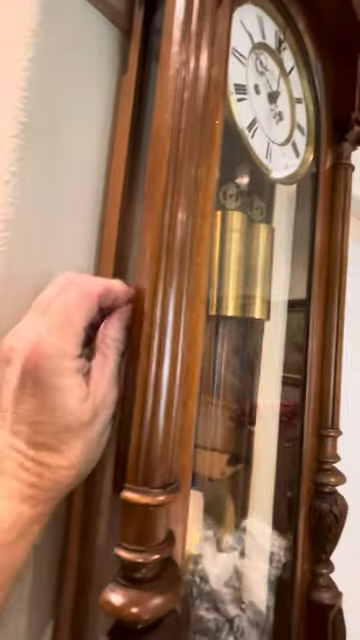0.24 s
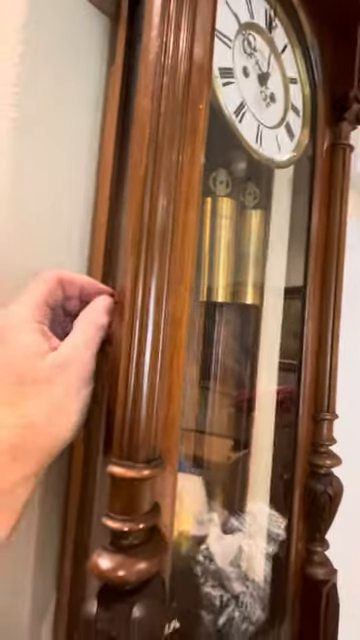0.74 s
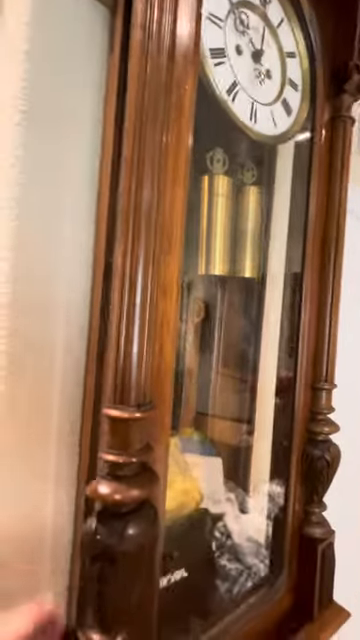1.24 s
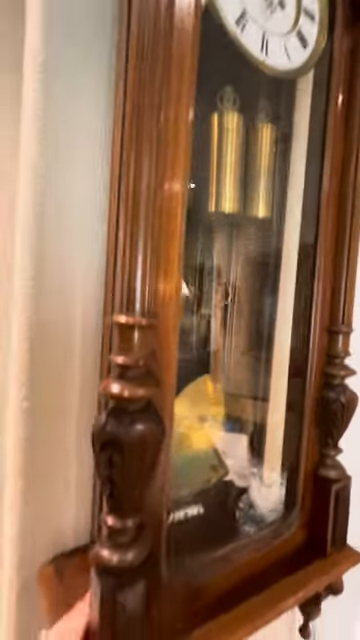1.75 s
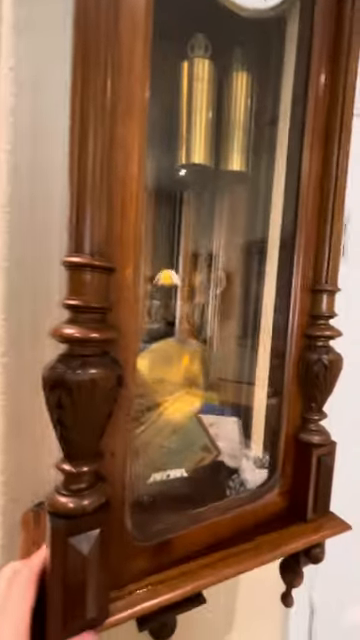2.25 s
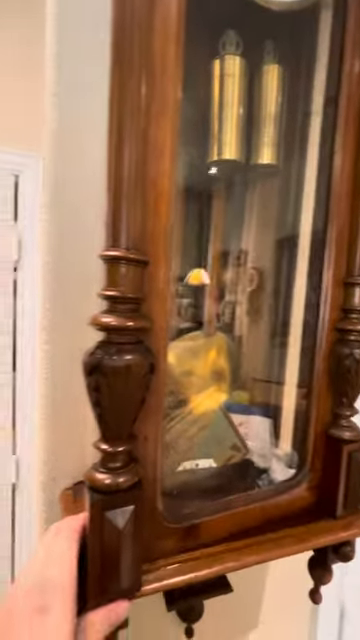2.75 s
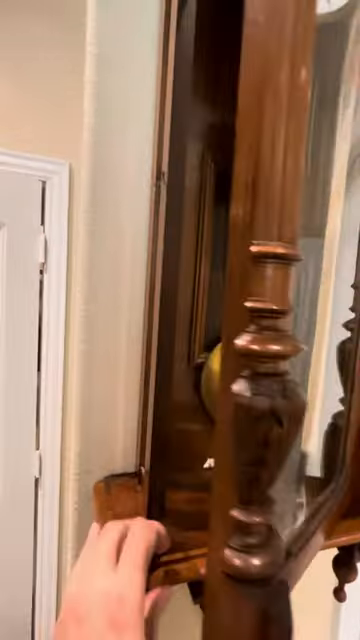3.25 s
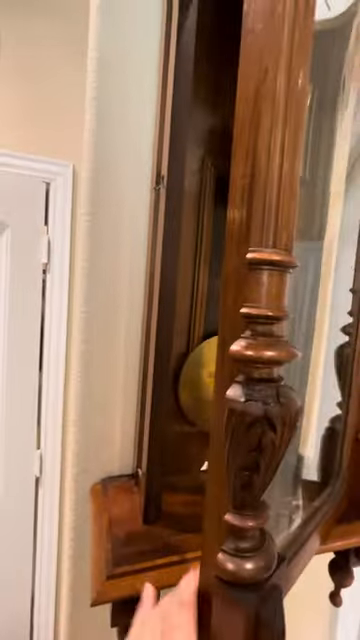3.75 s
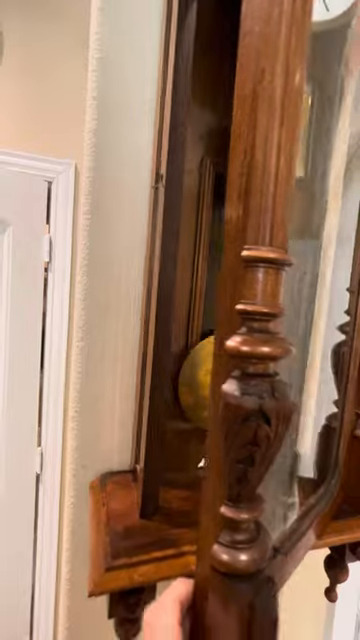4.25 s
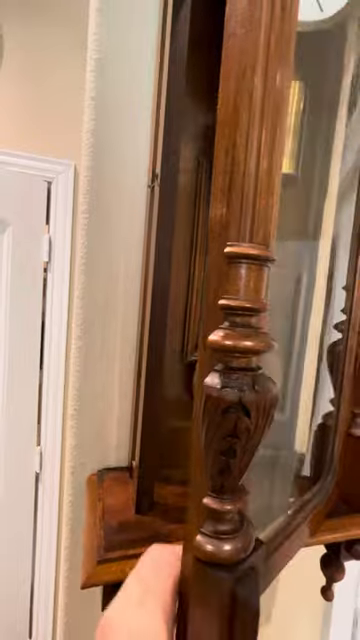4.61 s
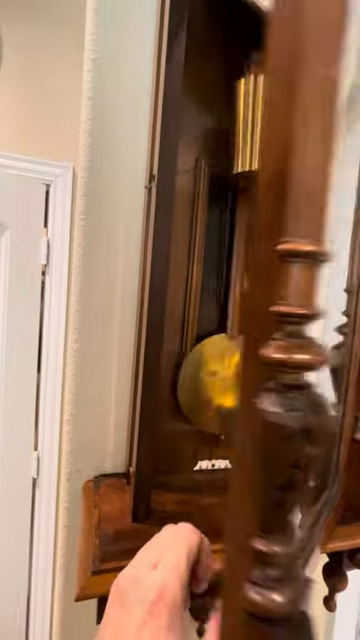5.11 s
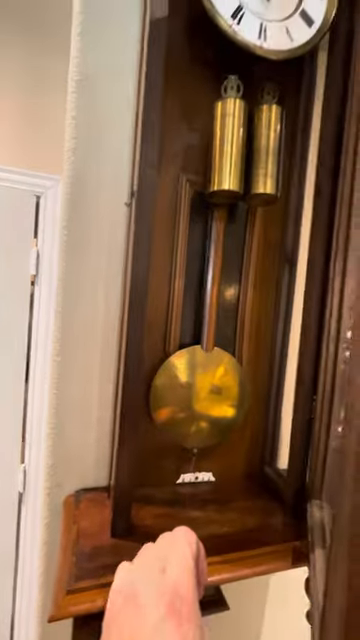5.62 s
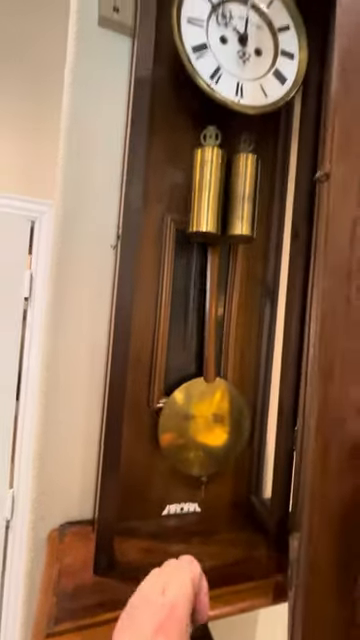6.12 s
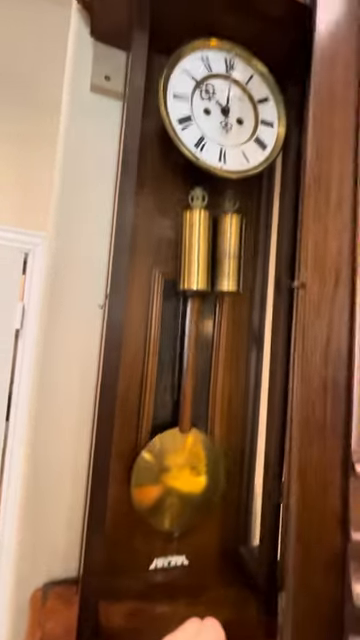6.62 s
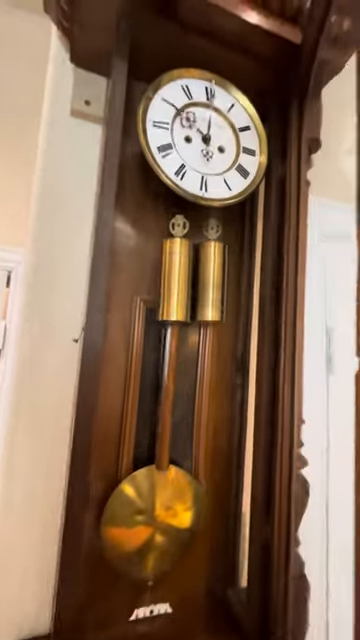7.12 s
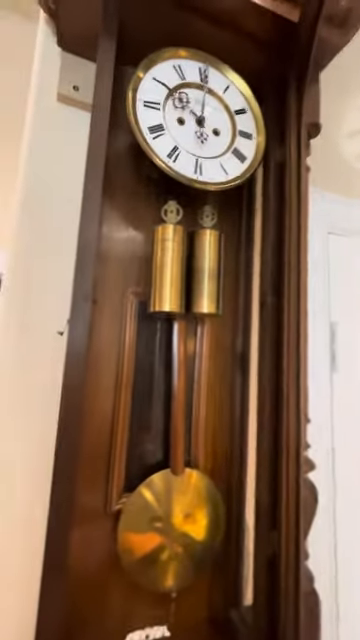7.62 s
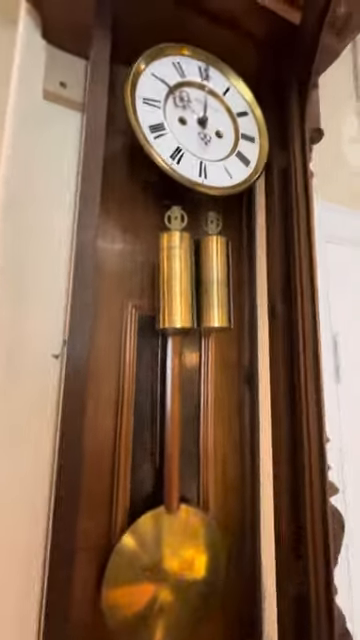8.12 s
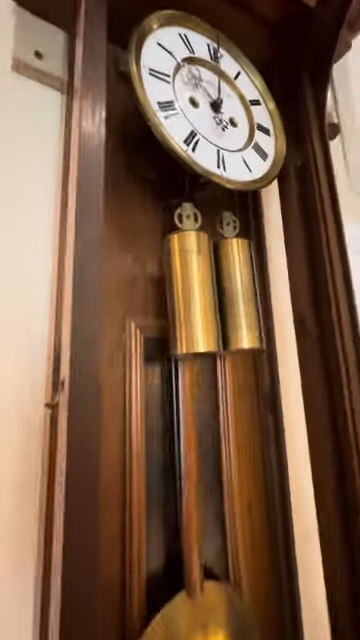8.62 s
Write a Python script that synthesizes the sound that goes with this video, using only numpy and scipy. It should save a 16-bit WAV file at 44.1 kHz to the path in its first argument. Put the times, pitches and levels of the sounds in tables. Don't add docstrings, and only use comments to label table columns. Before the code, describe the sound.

A hand unlatches and opens the glazed door of a wooden wall clock, with sharp snaps, woody knocks, rubbing and faint ticks.

```python
import sys
import numpy as np
from scipy import signal
from scipy.fft import rfft, irfft, next_fast_len
from scipy.io import wavfile
from scipy.ndimage import uniform_filter1d

SR = 44100
rng = np.random.default_rng(int(sys.argv[2]) if len(sys.argv) > 2 else 0)


def volts_from_decibels(level):
    exponent = np.asarray(level, float) / 20
    return 10 ** exponent


def transcribe(u):
    v = np.clip(np.atleast_2d(u).T, -1, 1)
    q = np.round(v * 32767).astype(np.int16)
    wavfile.write(sys.argv[1], SR, q)


N = 390726
HZ = np.maximum(np.fft.rfftfreq(next_fast_len(N + SR), 1 / SR), 1)

# start in seconds, strength in dB, sharpness in dB,
# weight on the panels in dB, contact length in seconds.
SNAPS = [
    (0.191, -37, -5, 4, 0.02),
    (1.8483, -49, 3, 5.5, 0.026),
    (2.0771, -30, 5.5, -10, 0.024),
    (2.6262, -28.5, 7.5, -17, 0.0088),
    (2.8063, -22, 11, -5.5, 0.017),
    (3.5285, -33.5, 2.5, -12.5, 0.018),
    (3.7895, -28, 7, -6, 0.0337),
    (4.9251, -29, 15, -10, 0.013),
    (4.9304, -24.5, 5, -10.5, 0.024),
    (5.4283, -37.5, -8, -8, 0.03),
]
TOUCHES = [(7.871, -41.5, -9.5, -0.5, 0.13), (3.515, -43, -14, -30, 0.0056), (.001, -60, -33, -18, 0.13),
           (.538, -60, 6, -2, 0.016), (.5482, -56.5, -7, -0.5, 0.064), (.816, -66.5, 16, 15.5, 0.023),
           (.8724, -64, -16, -2, 0.039), (1.175, -69.5, 0, -4.5, 0.013), (4.347, -40, -2, -22, 0.02),
           (2.269, -60.5, -31, -7, 0.11), (3.1874, -47, -3, -1.5, 0.035), (3.225, -48, -4, -1, 0.0126),
           (3.401, -74, 16, 8.5, 0.053), (3.7363, -56, -13.5, -6, 0.12), (3.9964, -62.5, 9.5, -8, 0.05),
           (4.2384, -64, 0, -3, 0.088), (5.2143, -54, 3, -16, 0.028), (5.512, -49.5, -10, 6.5, 0.089),
           (5.7777, -55.5, 2.5, -11, 0.054), (8.163, -64, 7, 5.5, 0.11), (8.183, -50, -0.5, -10, 0.096),
           (8.2462, -51.5, -8.5, 0.5, 0.12)]
# start in seconds, strength in dB, brightness in dB,
# sharpness in dB, contact length in seconds.
KNOCKS = [(0.195, -32.5, -3, 2, 0.047), (0.84, -47.5, -2, 0, 0.0071), (1.974, -40.5, -12.5, -18, 0.02),
          (2.78, -42.5, -5.5, 4, 0.0092), (3.036, -45, -4.5, 0, 0.046), (3.491, -40.5, -18.5, -26, 0.014),
          (4.06, -56.5, -12.5, 14.5, 0.013), (4.2999, -26.5, -30, 0.5, 0.01),
          (4.3085, -32, -8.5, -2.5, 0.04), (4.327, -34.5, -4, -8, 0.058), (4.567, -43.5, -17, -12, 0.019),
          (4.642, -50, -3.5, 4, 0.028), (5.348, -49.5, -5, -2, 0.052), (5.582, -44.5, -10, -27, 0.025),
          (7.402, -59, 2.5, -11.5, 0.095), (7.534, -53.5, -19.5, 2, 0.043), (7.678, -53.5, -18, -16, 0.053),
          (7.736, -55.5, -18, -16, 0.036)]
# start in seconds, strength in dB, sharpness in dB.
HINGE_SLIPS = [(6.5518, -56.5, -22), (6.5605, -55.5, -9), (6.6008, -48.5, -9), (6.6385, -54.5, -2),
               (6.6549, -52, -20), (6.6976, -46, -10), (6.7407, -56, -12), (6.773, -52.5, -14),
               (6.8269, -51, -6), (6.8859, -46, -5), (6.905, -51.5, -8), (6.9308, -44.5, -5),
               (6.96, -45, -5), (6.98, -47, -7), (7.004, -43, -4.5), (7.025, -49, -10), (7.05, -30.5, 0.5),
               (7.0934, -32, 4), (7.1358, -30, 3.5), (7.1739, -36.5, -8), (7.213, -39.5, -5),
               (7.2522, -36.5, -9), (7.3124, -51, -4)]
# start in seconds, peak in dB, main ring in Hz,
# second ring in Hz, t60 in seconds.
BUMPS = [(0.198, -35, 295, 400, 0.094), (.222, -42.5, 240, 150, .08), (.60, -57, 528, 690, 0.1),
         (.82, -51.5, 639.5, 782, 0.23), (.84, -52, 740, 560, 0.098), (.868, -53, 641, 910, 0.11),
         (.9, -62, 710, 534, .1), (1.661, -62.5, 272, 209, 0.18), (2.809, -26.5, 298, 215, 0.076),
         (2.861, -38, 277, 150.6, .2), (2.99, -38, 151, 290, 0.146), (3.025, -37.5, 141, 280, .1),
         (3.798, -51, 250, 420, 0.063), (4.068, -40.5, 192, 284, 0.036), (4.297, -40, 1182, 690, 0.046),
         (4.563, -43, 823, 1240, 0.025), (4.312, -27, 262, 138, 0.05), (4.37, -33.5, 135, 180, .06),
         (4.326, -34, 184, 337, 0.1), (4.36, -39.5, 132.4, 294, 0.17), (4.933, -40, 415, 868, 0.17),
         (4.94, -44.5, 215, 1080, .06), (7.548, -50, 414, 860, 0.041), (7.562, -60, 507, 925, 0.028),
         (8.249, -45, 450, 715, 0.062), (2.628, -44, 250, 400, 0.056), (4.064, -48, 230, 149, 0.038)]
CHIPS = [(0.00091, -47.5, 2700, 1280, 0.14), (.199, -35.5, 3130, 873, 0.09), (2.068, -53, 5900, 3350, 0.03),
         (2.0775, -16.5, 4600, 1890, 0.01), (2.779, -47, 1790, 4200, .01),
         (2.8083, -16.5, 6900, 11040, 0.009), (4.311, -43, 2700, 1490, 0.034),
         (4.329, -29.5, 2820, 1460, 0.018), (4.339, -35, 2840, 5150, 0.01), (6.553, -39, 1450, 920, 0.024),
         (6.596, -44, 1380, 800, .02), (6.657, -39, 1330, 800, 0.028), (6.7, -44, 2670, 5330, 0.032),
         (6.742, -37, 1440, 660, .02), (7.09, -36, 1500, 5400, 0.023), (3.2, -53.5, 4000, 2300, 0.0037),
         (3.745, -47, 1350, 2700, 0.037), (3.7905, -28, 5530, 3400, 0.007), (.511, -67, 6000, 3030, .01),
         (7.402, -46.5, 2900, 1400, .02), (7.415, -57.5, 2700, 2800, .02), (7.873, -38, 5380, 2400, .02),
         (8.184, -42, 2700, 2200, 0.02), (1.977, -45.5, 2300, 4200, .02), (1.925, -45, 4230, 5670, .02),
         (8.255, -50, 2500, 1300, 0.019), (7.174, -39, 1600, 5300, .015), (7.213, -42, 840, 2700, .015),
         (7.252, -42, 1480, 4800, .015), (5.512, -46, 1500, 3100, .02), (.548, -47, 4500, 3040, 0.029),
         (.03, -57, 2460, 1200, 0.025)]
# start in seconds, peak in dB, low ring in Hz, high ring in Hz, high ring in dB.
TICKS = [
    (0.796, -44, 2250, 5350, -7),
    (1.487, -48.5, 2364, 5380, -13.5),
    (1.979, -42, 2060, 1660, -6),
    (2.278, -52, 1930, 5270, -2.5),
    (3.744, -50, 2700, 5400, -12),
    (2.475, -53, 1850, 2600, -16),
    (5.219, -47.5, 1320, 2600, 3),
    (5.92, -45, 1330, 2700, 1.5),
    (6.486, -37.5, 1665, 3760, -17),
]

# frequency in Hz, level in dB, t60 in seconds.
CARCASS = [(110.8, -30, 0.05), (133, -1.5, 0.054), (178, 1, 0.081), (215, 2.5, 0.06), (290, 1.5, 0.085),
           (346, 2, 0.062), (407.5, 2, 0.045)]
PANELS = [(455, -3, 0.081), (578, 3, 0.085), (690, 6.5, 0.052), (792, 8, 0.046), (881, 10, 0.032),
          (1088, 11.5, 0.018), (1287, 1.5, 0.06), (1501, 2.5, 0.029), (1785, -3, 0.072),
          (2000, -5.5, 0.056), (2600, -3, 0.0087)]
LATCH = [(4180, -4.5, 0.012), (4970, 3, 0.0032), (5400, -0.5, .01), (5520, 6.5, 0.0058), (6477, 1.5, 0.015),
         (10470, -7, 0.012), (10900, -5, 0.0037), (12000, -6, 0.003)]
PIN = [(2700, -25, 0.023), (5350, -9.5, 0.033), (6050, -7, 0.01)]
PIN_TOP = [(13100, -33, .03), (14470, -21, 0.049), (15100, -35, 0.033)]
# frequency in Hz, density in dB per Hz.
TREBLE = [(2000, -50.5), (4200, 1.5), (6000, -7.5), (8500, 14), (11500, 3.5), (12800, -18), (14500, -38.5),
          (16500, -40)]
CLACK = [(700, -15), (1500, 10), (2500, 12), (3800, 2.5), (5500, -3), (12000, -63)]

# start in seconds, hold in seconds, push in dB,
# drone against push in dB, rub against push in dB.
GRIPS = [(0, 0.12, -61, 4.5, -11), (0.21, 0.15, -57.5, -10, -7.5), (0.386, 0.14, -53, -2.5, -23),
         (0.612, 0.14, -63.5, 3, -11), (1.895, 0.069, -54, 7, -9), (2.106, 0.049, -53, 2.5, -11),
         (2.66, 0.042, -49.5, -1, -21), (2.865, 0.14, -48.5, 5, -10), (3.03, 0.2, -50.5, -2, -11.5),
         (3.535, 0.047, -51, -0.5, -11.5), (4.338, 0.031, -47.5, -28, -8), (4.423, 0.074, -56.5, -0.5, -6),
         (4.589, 0.13, -53, -4, -16), (4.794, 0.11, -75.5, 17.5, 8.5), (5.015, 0.025, -53, -1, -10.5),
         (5.112, 0.12, -68, 6.5, 0), (5.431, 0.056, -53, 3, -9.5), (5.612, 0.28, -60.5, -3.5, -12.5),
         (6.372, 0.087, -73, 6.5, -2.5), (6.584, 0.13, -53, -0.5, -8), (6.776, 0.42, -55, 4.5, -5.5),
         (7.049, 0.16, -45, -1.5, -5.5), (7.54, .04, -59, -12.5, -23.5), (8.165, 0.059, -74.5, 5.5, -7),
         (8.636, 0.12, -59.5, -12, -18.5)]
# start in seconds, hold in seconds, rustle in dB.
SLIDES = [(0.215, 0.17, -83.5), (1.42, 0.035, -95), (1.586, 0.13, -91), (1.911, 0.013, -68),
          (2.831, 0.065, -62), (2.957, 0.26, -77.5), (3.421, 0.037, -84.5), (3.703, 0.34, -84.5),
          (4.326, 0.012, -65), (4.443, 0.033, -80), (4.732, 0.16, -80.5), (5.036, 0.12, -75.5),
          (5.151, 0.096, -77.5), (5.263, 0.087, -81.5), (5.923, 0.12, -82), (6.619, 0.45, -86.5),
          (7.032, 0.21, -68), (7.894, 0.097, -77.5), (8.176, 0.075, -75)]
# start in seconds, end in seconds, level against resting in dB.
RESTS = [
    (5.96, 6.46, 0),
    (8.4, 8.65, -1),
    (8.65, 8.9, -5),
]
# frequency in Hz, density in dB per Hz.
RUMBLE = [(20, -50.5), (32, -32.5), (42, 3), (60, -5), (100, -2), (130, -11), (180, -17), (300, -70)]
RUSTLE = [(900, -7.5), (1300, -4.5), (1800, -6.5), (2500, -1), (3800, -8), (5500, -7), (7000, -11),
          (8000, -10.5), (10000, -11.5), (11000, -11), (11700, -38.5), (12200, -41), (16500, -54.5)]
# time in seconds, gain in dB.
GATE = [(0, -3.5), (0.401, -4), (0.499, -10), (.56, -2), (0.799, -3), (0.959, -8), (1.38, -8.5), (1.6, -4),
        (2.55, -4), (3.361, -6), (4.15, -7), (4.6, -2.5), (6.15, -5), (6.421, -2), (7.399, -5), (7.8, -6.5),
        (8.002, -1.5), (8.86, -5)]
# frequency in Hz, t60 in seconds.
ROOM_T60 = [(100, 0.7), (400, 0.26), (1500, 0.25), (5000, 0.38), (12000, 0.27)]

# frequency in Hz, lead of the left port in radians.
PORT_PHASE = [(100, 0), (260, .3), (600, 2.4), (1450, 4.2), (1850, 2.6), (3400, 4.1), (5170, 13.0),
              (6460, 13.5), (8200, 15.55), (10000, 15.8), (10600, 17.7), (11400, 18.6), (12500, 19.3),
              (16000, 19.6)]
# frequency in Hz, shared part from 0 to 1.
PORT_LIKENESS = [(60, .92), (200, .93), (500, .55), (1100, .65), (1800, .55), (3800, .45), (5500, .75),
                 (7300, .75), (8300, .96), (9300, .99), (9900, .998), (12200, 1)]
# frequency in Hz, left minus right in dB.
PORT_BALANCE = [(60, 1), (250, 1), (600, 3.5), (1200, 2.3), (2200, -1.3), (6000, -1), (8300, -.3),
                (9500, 0)]


def rms_one(x):
    return x / np.sqrt(np.mean(x ** 2) + 1e-20)


def at_hz(points, hz):
    table = np.array(points)
    return np.interp(np.log(hz), np.log(table[:, 0]), table[:, 1])


def shaped(x, response):
    size = next_fast_len(N + SR)
    return irfft(rfft(x, size) * response, size)[..., :N]


def causal(points):
    cepstrum = irfft(np.log(volts_from_decibels(at_hz(points, HZ))))
    half = len(cepstrum) // 2
    folded = np.r_[cepstrum[0], 2 * cepstrum[1:half], np.zeros(len(cepstrum) - half)]
    return np.exp(rfft(folded))


def body(x, modes):
    out = 0
    for k, (hz, level_db, t60) in enumerate(modes):
        radius = volts_from_decibels(-60 / (t60 * SR))
        angle = 2 * np.pi * hz / SR
        poles = [1, -2 * radius * np.cos(angle), radius * radius]
        out = out + (-1) ** k * signal.lfilter([0, volts_from_decibels(level_db) * np.sin(angle)], poles, x + 1e-18)
    return out


def filtered(x, order, hz, kind):
    return signal.sosfilt(signal.butter(order, hz, kind, fs=SR, output="sos"), x)


def flicker(rate, depth_db):
    knots = rng.standard_normal(int(40 * N / SR) + 2)
    return volts_from_decibels(depth_db * np.interp(np.arange(N) * rate / SR, np.arange(len(knots)), knots))


def hard_and_dull_blows():
    rows = []
    for table, carcass_db in [(SNAPS, -0.5), (TOUCHES, -4.5)]:
        for s, db, sharp, weight, length in table:
            rows.append((s, db + sharp, db, db + weight, db + weight + carcass_db, length))
    for s, db, bright, sharp, length in KNOCKS:
        panel_db = db - 3 + 0.98 * bright
        rows.append((s, db + bright + sharp, db + bright, panel_db, db, length))
    return rows


def hinge_slips():
    rows = [(s, db + sharp, db, -16.5 + 0.59 * db, -42.5, 0.044) for s, db, sharp in HINGE_SLIPS]
    drives = blows(rows, rise=0.2, thud_s=0.0066, crack=1.0)
    return drives * volts_from_decibels([[[0]], [[0]], [[-1]], [[-7]]])


def blows(rows, rise, thud_s, crack):
    out = np.zeros((4, 2, N + 4410))
    t = np.arange(4410) / SR
    grit = rng.standard_normal((len(rows), 4, 2, len(t)))
    for (s, *levels_db, length), g in zip(rows, grit):
        length = np.clip(length, .003, .1)
        fade = np.exp(-np.log(1000) * t / length) * np.minimum(t / (rise * length), 1)
        g[0] *= 0.32 + crack * np.exp(-t / (0.05 * length))
        g[2:] /= np.sqrt(length / 0.036)
        g[3] *= np.minimum(t / thud_s, 1)
        at = round(s * SR)
        out[:, :, at:at + len(t)] += volts_from_decibels(np.array(levels_db))[:, None, None] * g * fade
    return out[..., :N]


def snap(treble, clack):
    return volts_from_decibels(9.0) * shaped(treble, causal(TREBLE)) + volts_from_decibels(8.5) * shaped(clack, causal(CLACK))


def rings(rows, contact_s, twin, damped):
    out = np.zeros(N + 12000)
    steps = rng.random((len(rows), 400))
    decay = np.exp(-np.arange(400) / (contact_s * SR))
    for (s, level_db, low_hz, high_hz, high_db, t60), step in zip(rows, steps):
        click = np.r_[(step - .4) * decay, np.zeros(11600)]
        modes = [(low_hz, 0, damped * t60), (twin * low_hz, 0, damped * t60), (high_hz, 0, t60)]
        gains = volts_from_decibels(level_db + np.array([0, -5, high_db]))
        at = round(s * SR)
        for mode, gain in zip(modes, gains):
            ring = body(click, [mode])
            out[at:at + len(click)] += gain * ring / np.abs(ring).max()
    return out[:N]


def wooden_case(panel, thud):
    wood = volts_from_decibels(-23) * body(panel, PANELS) + volts_from_decibels(-23.0) * body(thud, CARCASS)
    bumps = [(s, db, main_hz, second_hz, -6, t60) for s, db, main_hz, second_hz, t60 in BUMPS]
    wood += rings(bumps, contact_s=0.0043, twin=1.0, damped=0.97)
    return filtered(wood, 2, 75, "high")


def latch_metal(treble):
    chips = [(s, db, main_hz, second_hz, -4, min(t60, .022)) for s, db, main_hz, second_hz, t60 in CHIPS]
    return volts_from_decibels(-14) * body(treble, LATCH) + rings(chips, contact_s=0.0033, twin=0.79, damped=1.0)


def hinge_pin(slips):
    return volts_from_decibels(-15.5) * body(slips[1], PIN) + body(slips[0], PIN_TOP)


def escapement():
    rows = [(*row, .016) for row in TICKS]
    ticks = volts_from_decibels(1.5) * rings(rows, contact_s=0.0035, twin=1.2, damped=1.0)
    return filtered(ticks, 2, [875, 6500], "band")


def strokes(start, hold, level_db, attack, release):
    t = np.arange(0, N + 64, 64)[:, None] / SR
    swell_db = attack * np.maximum(start - t, 0)
    fall_db = release * np.maximum(t - start - hold, 0)
    power = np.sum(volts_from_decibels(2 * (level_db - swell_db - fall_db)), axis=1)
    return np.interp(np.arange(N) / SR, t[:, 0], np.sqrt(power))


def effort():
    gate_db = np.interp(np.arange(N) / SR, *np.transpose(GATE))
    air_db = [-63, -73.5, -83.5, -83]
    gate_share = [0.9, 0.959, 1.798, 2.6]
    air = [volts_from_decibels(db + share * gate_db) for db, share in zip(air_db, gate_share)]
    start, hold, push, drone, rub = np.transpose(GRIPS)
    moves = [strokes(start, hold, db, attack=303.5, release=119.5) for db in (push, push + drone, push + rub)]
    moves.append(strokes(*np.transpose(SLIDES), attack=353.5, release=255))
    return [np.hypot(a, m) for a, m in zip(air, moves)]


def skin_rustle(white, rustle, still):
    hiss = rms_one(shaped(white, volts_from_decibels(at_hz(RUSTLE, HZ))))
    out = 0
    for centre in np.arange(9.5, 14.1, .5):
        band = np.clip(1 - 2 * np.abs(np.log2(HZ) - centre), 0, 1)
        patch = flicker(12, 4 if centre < 13 else 8)
        if centre < 10.2:
            patch = patch * still
        if centre > 12.8:
            patch = patch * (rustle / volts_from_decibels(-80)) ** 0.21
        out = out + volts_from_decibels(21.5) * rustle * patch * shaped(hiss, band)
    return out


def hand():
    rumble, drone, rub, rustle = effort()
    for start, end, sink_db in RESTS:
        rustle[round(start * SR):round(end * SR)] = volts_from_decibels(-86 + sink_db)
    rustle = uniform_filter1d(rustle, size=800)
    still = np.ones(N)
    still[round(6.04 * SR):round(6.34 * SR)] = volts_from_decibels(-10)
    still = uniform_filter1d(still, size=2000)
    white = rng.standard_normal((4, 2, N))
    low = rumble * rms_one(shaped(white[0], volts_from_decibels(at_hz(RUMBLE, HZ))))
    low += volts_from_decibels(-2.0) * drone * flicker(25, 1.3) * rms_one(body(white[1], CARCASS))
    shared = flicker(21, 0.94)
    damped_panels = [(hz, db, 0.43 * t60) for hz, db, t60 in PANELS]
    grains = np.repeat(volts_from_decibels(4.0 * rng.standard_normal(N // 128 + 1)), 128)[:N]
    high = volts_from_decibels(9.0) * rub * still * flicker(20, 2.7) * rms_one(body(white[2] * grains, damped_panels))
    high += skin_rustle(white[3], rustle, still)
    return low + shared * high


def as_clicks(drive, size=256):
    energy = np.add.reduceat(drive ** 2, np.arange(0, N, size), axis=-1)
    out = np.zeros_like(drive)
    out[..., ::size] = np.sqrt(energy) * rng.choice([-1, 1], energy.shape)
    return np.roll(out, size, axis=-1)


def room(x, gap_s=0.0005):
    t, tail = np.arange(SR) / SR, 0
    white = rng.standard_normal((2, SR))
    for low in 60 * 2. ** np.arange(8):
        band = filtered(white, 2, [low, min(2 * low, 12000)], "band")
        tail = band * volts_from_decibels(-60 * t / at_hz(ROOM_T60, 1.8 * low)) - tail
    tail *= np.minimum(t / gap_s, 1)
    response = rfft(tail / np.sqrt(np.sum(tail ** 2) / 2), next_fast_len(N + SR))
    power = np.abs(response) ** 2
    fine, broad = [np.abs(uniform_filter1d(power, size=size) + 1e-9) for size in (250, 4000)]
    even = [causal(np.c_[HZ, 10 * np.log10(b / f)]) for f, b in zip(fine, broad)]
    return shaped(x, response * even)


def scene():
    slips = hinge_slips()
    hits = blows(hard_and_dull_blows(), rise=0.074, thud_s=0.0025, crack=0.91)
    treble, clack, panel, thud = hits + slips
    wood = wooden_case(panel, thud)
    metal = latch_metal(treble)
    small_parts = escapement() + hinge_pin(slips)
    echo = volts_from_decibels(-8.5) * snap(as_clicks(treble), as_clicks(clack))
    echo = echo + volts_from_decibels(-2.5) * wood + volts_from_decibels(-5) * small_parts + volts_from_decibels(-15) * metal
    return snap(treble, clack) + wood + small_parts + metal + room(echo) + hand()


def two_ports(field):
    alike = np.clip(at_hz(PORT_LIKENESS, HZ), 0, 1)
    common = shaped(field[0], np.sqrt((1 + alike) / 2))
    own = shaped(field[1], np.sqrt((1 - alike) / 2))
    turn = np.exp(.5j * np.interp(HZ, *np.transpose(PORT_PHASE))) * volts_from_decibels(at_hz(PORT_BALANCE, HZ) / 2)
    return np.array([shaped(common + own, turn), shaped(common - own, 1 / turn)])


def suppress(x, size=1024):
    hz, _, cells = signal.stft(x, SR, nperseg=size)
    power = np.abs(cells) ** 2 + 1e-20
    around = np.maximum(uniform_filter1d(power, size=15, axis=1), power / 15)
    share = 0.18 * (hz > 400)[:, None]
    gain = np.minimum(power / around, 3) ** share
    return signal.istft(cells * gain, SR, nperseg=size)[1][:, :N]


def roll_off(x):
    return signal.sosfilt(signal.butter(12, 16000, fs=SR, output="sos"), x)


def record(dry):
    ports = filtered(two_ports(dry), 4, [36, 15000], "band")
    clip_top = .8
    ports = clip_top * np.tanh(ports / clip_top)
    ports = suppress(filtered(ports, 8, 14000, "low"))
    return roll_off(ports)


dry = scene()
out = record(dry)
transcribe(out)
```